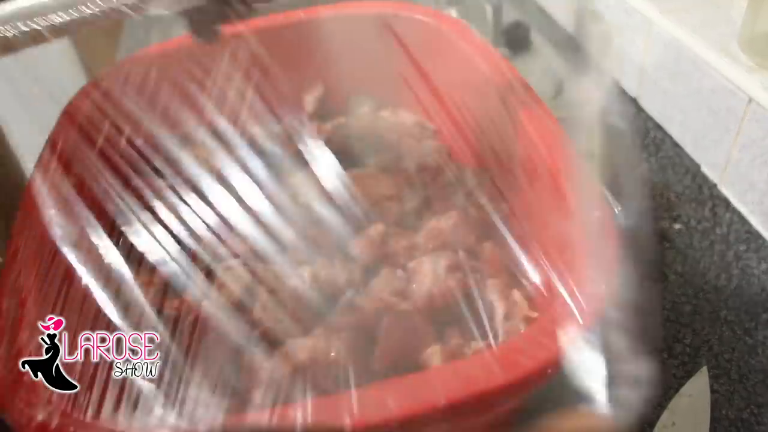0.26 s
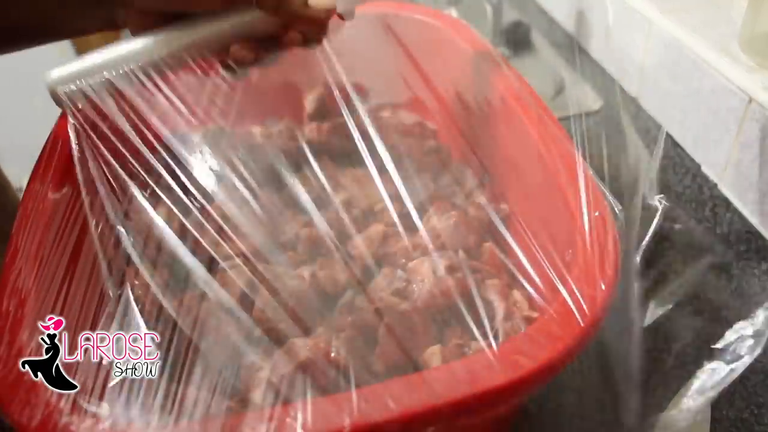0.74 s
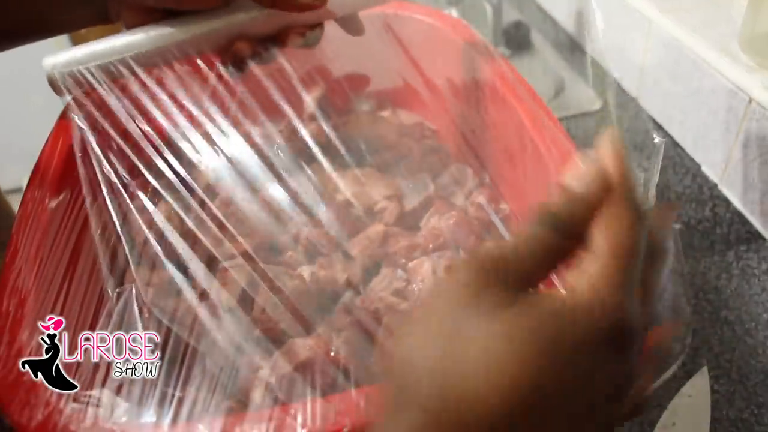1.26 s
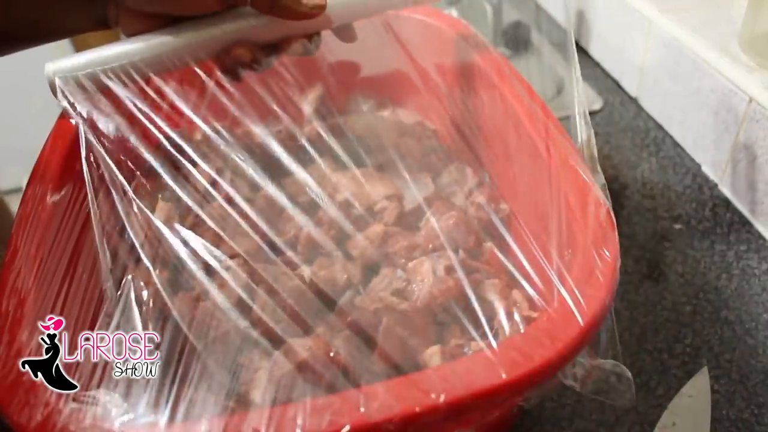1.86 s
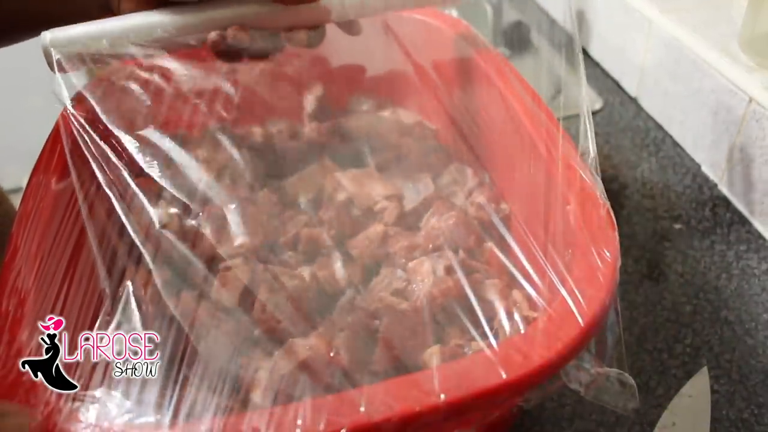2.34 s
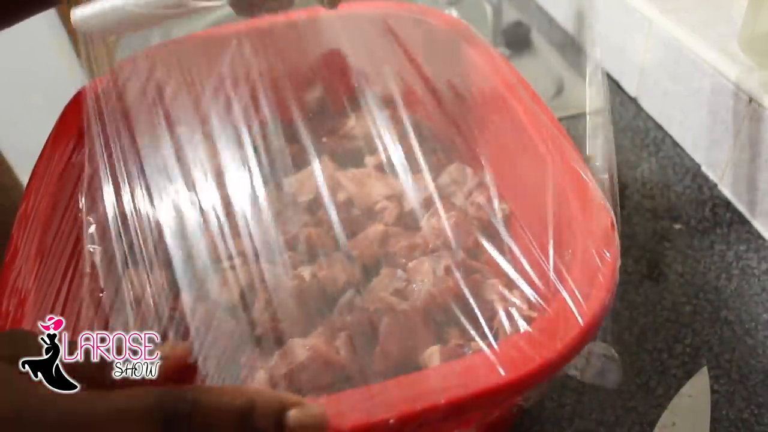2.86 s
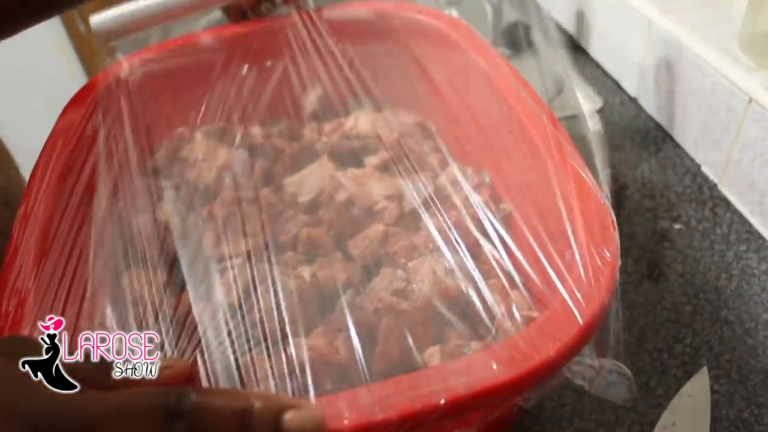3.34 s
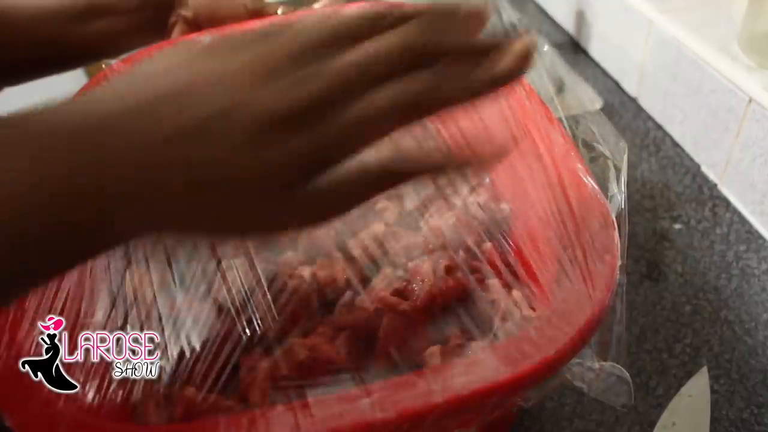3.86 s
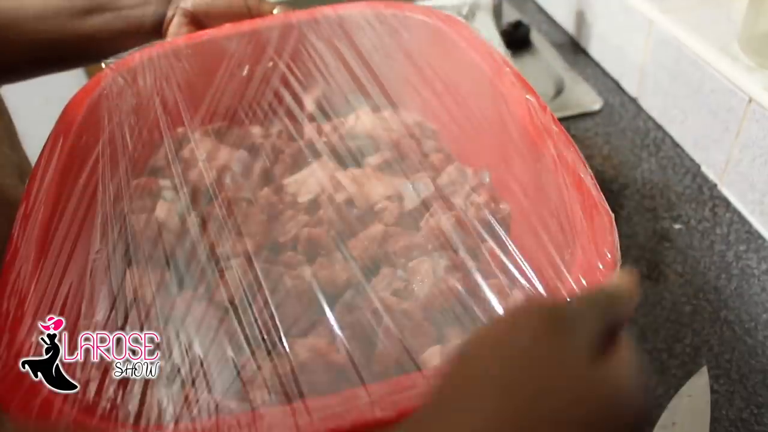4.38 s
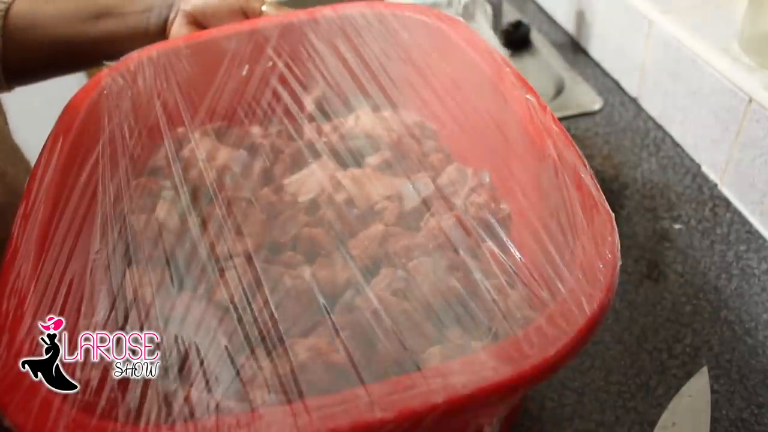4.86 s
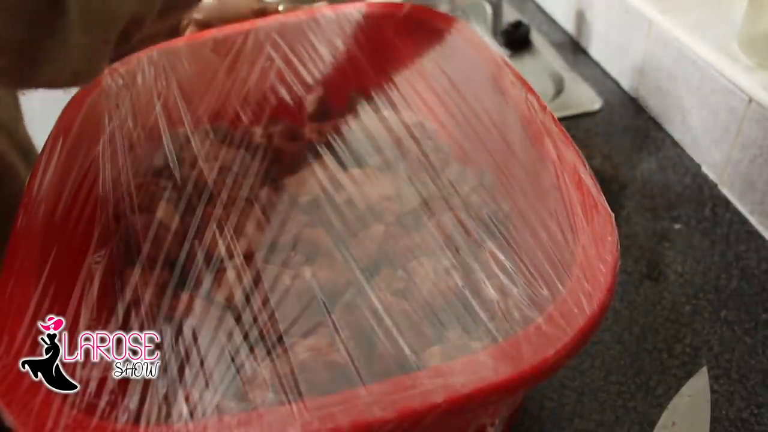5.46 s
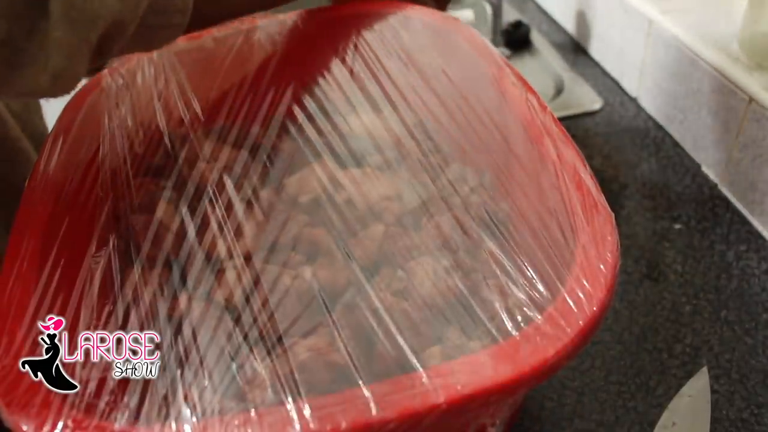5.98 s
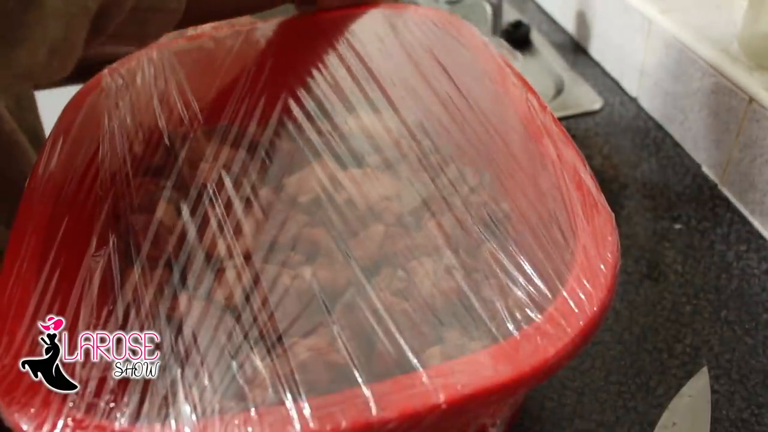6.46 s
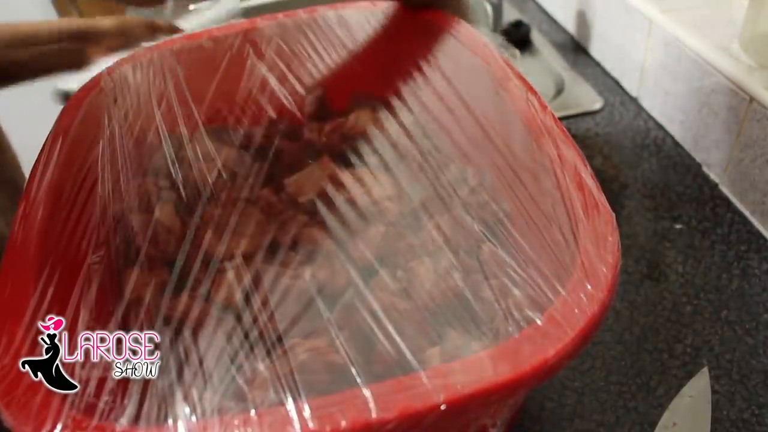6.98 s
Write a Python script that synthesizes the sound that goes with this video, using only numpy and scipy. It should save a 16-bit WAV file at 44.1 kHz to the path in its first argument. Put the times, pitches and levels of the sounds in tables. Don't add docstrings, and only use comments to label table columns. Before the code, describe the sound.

In a small tiled kitchen, heard close up in stereo over soft hiss and mains hum, cling film is stretched around a plastic bowl. The first 0.9 seconds hold faint rustles and tiny ticks, then a short chirping snap. From 1.3 to 1.9 s, crackles, squeaks, a low creak and hollow bowl knocks cluster together. A deep thump at 2.3 s is followed by a quick rising squeak near 2.45 s, then quiet crinkling. At 3.4 s a sharp snap rings brightly, with buzzy squeaks just after. Around 4.05 s a low thud hits the bowl, followed by fine crackles until 4.8 s. Small pops come at 5.1 and 5.7 s. A firm knock lands at 6.1 s, rustles and bumps follow from 6.5 s, and the loudest bright crackling burst with a shove arrives at 7 s, ringing briefly.

```python
import sys
import numpy as np
from scipy import signal
from scipy.fft import rfft, irfft, next_fast_len
from scipy.io import wavfile
from scipy.ndimage import uniform_filter1d, map_coordinates

SR = 44100
rng = np.random.default_rng(int(sys.argv[2]) if len(sys.argv) > 2 else 0)


def makeup_ratio(level_db):
    decades = np.asarray(level_db, float) / 20
    return 10 ** decades


def unload_audio(sound):
    columns = np.transpose(np.atleast_2d(sound))
    steps = np.round(np.clip(columns, -1, 1) * 32767)
    wavfile.write(sys.argv[1], SR, steps.astype(np.int16))


N = 317975


def evened(x):
    return x / np.sqrt(np.mean(x ** 2) + 1e-20)


def read(points, hz):
    f, value = np.transpose(points)
    return np.interp(np.log(hz + 1), np.log(f + 1), value)


def add(mix, s, sound):
    part = mix[:, round(s * SR):][:, :sound.shape[1]]
    part += sound[:, :part.shape[1]]


def highpass(x, order, hz):
    return signal.sosfilt(signal.butter(order, hz, "high", fs=SR, output="sos"), x)


def resonate(x, hz, width):
    turn = np.exp(2j * np.pi * np.cumsum(hz * np.ones(x.shape[-1])) / SR)
    r = np.exp(-np.pi * width / SR)
    return 2 * (turn * signal.lfilter([1 - r], [1, -r], x / turn + 1e-18)).real


def coloured(x, points):
    log_gain = np.log(makeup_ratio(read(points, abs(np.fft.fftfreq(1024, 1 / SR)))))
    taps = np.fft.ifft(np.exp(np.conj(signal.hilbert(log_gain)))).real[:256]
    return signal.oaconvolve(x, taps[None], axes=1)[:, :x.shape[1]]


def slips(count, per_s, spread_db):
    draw = rng.random((count, 4))
    size = makeup_ratio(-spread_db * np.log(draw[:, 0] + .015))
    size = size * np.sign(draw[:, 1] - .5) * (draw[:, 2] < per_s / SR)
    delay = np.round(3.2 * draw[:, 3] - 1.6).astype(int)
    late = np.clip(np.arange(count) + delay, 0, count - 1)
    return np.array([size, np.bincount(late, size, count)])


def thin(x):
    return evened(highpass(x, 2, 420))


def film(drive, pitch_hz):
    ring = resonate(drive, pitch_hz, 1020) + makeup_ratio(-12.5) * resonate(drive, 1.9 * pitch_hz, 770)
    return thin(resonate(ring, 1.3 * pitch_hz, 8100))


# frequency in Hz, level in
# dB per Hz.
FIZZ = [(1760, 15.5), (3000, -51), (3380, 14), (3890, 3), (8110, 3.5), (12500, 2), (15800, -3),
        (17000, -50)]


def fizz(drive):
    return thin(coloured(drive, FIZZ))


# frequency in Hz, width in Hz, level in dB.
BOWL = [(133, 12, -13), (258, 61, 2), (404, 89, 1.5), (526, 78, -2), (595, 88, 2), (785, 230, 3)]


def bowl(push):
    ring = 0
    for hz, width, db in BOWL:
        ring = ring + makeup_ratio(db) / np.sqrt(width) * signal.lfilter(*signal.iirpeak(hz, hz / width, SR), push)
    return signal.lfilter(*signal.butter(2, 1100 / SR * 2), ring)


# start in seconds, length in seconds, effort in dB, film pitch in Hz, fizz in dB.
PEELS = [(1.635, 0.019, -21.5, 1570, -36), (3.421, 0.0033, -31.5, 2260, 0), (4.22, 0.16, -43.5, 2440, -1),
         (4.4, 0.065, -43, 2720, -7), (4.47, 0.098, -39, 2400, -3), (4.58, 0.27, -44.5, 2010, 0.5),
         (5.537, 0.013, -45, 1650, -8), (5.667, 0.0018, -36.5, 2030, -8), (5.76, 0.13, -57, 2100, -1),
         (6.07, 0.023, -27.5, 1680, 2), (6.99, 0.072, -16.5, 2460, -6)]
PULLS = [(0, 0.013, -47.5, 1750, -2.5), (.12, 0.091, -58, 1500, -2), (.498, 0.035, -42, 2620, -4),
         (1.74, .1, -37.5, 1300, -6), (1.85, 0.11, -35, 2300, -8.5), (2.55, 0.073, -54, 1400, 4.5),
         (2.66, 0.051, -48, 1520, -2), (2.77, 0.18, -56, 1480, -0.5), (2.915, 0.18, -51.5, 1900, 0.5),
         (3.05, 0.083, -44.5, 1780, -4), (3.14, 0.12, -48, 2150, -11), (3.59, 0.011, -37, 2030, -13),
         (4.09, 0.017, -24, 1100, -30), (4.35, 0.0042, -40, 1130, -17), (5.08, 0.021, -50.5, 1280, -12),
         (5.138, .002, -44, 1580, -24), (5.918, 0.2, -54.5, 1990, -4), (6.57, 0.059, -17, 1740, -2)]
PRESSES = [(.7, 0.25, -49, 1420, -6), (.936, .002, -29.5, 970, -23), (1.13, 0.23, -57, 1260, -25),
           (1.334, 0.034, -28, 1200, -3.5), (1.39, 0.056, -29.5, 1190, -11),
           (1.441, 0.0018, -24.5, 1300, -20), (1.48, 0.099, -33, 1100, -5.5), (1.67, 0.018, -31, 1360, -3),
           (2.326, 0.035, -24.5, 970, -32), (2.4, 0.11, -37, 1700, -12), (3.35, 0.043, -50, 1540, -4),
           (3.44, .06, -60, 2210, -35), (3.516, .002, -36.5, 2020, -26), (3.724, 0.027, -36, 1400, -1),
           (4.034, 0.051, -30, 1310, -9), (4.15, 0.082, -38, 1530, -4.5), (6.132, .002, -23.5, 820, -7),
           (6.22, 0.085, -40.5, 920, -3.5), (6.53, 0.012, -25.5, 1350, -8.5), (6.7, 0.11, -34.5, 1190, -11),
           (6.877, 0.07, -29.5, 1120, -17)]


def gestures():
    rise_s, rise_db = 0.037, 7
    rest_db, rest_hz, rest_push_db, rest_fizz_db = -63, 1300, 11.5, -20
    rest = [1, np.log(rest_hz), makeup_ratio(2 * rest_push_db), makeup_ratio(2 * rest_fizz_db)]
    sums = np.outer(rest, np.full(N, makeup_ratio(2 * rest_db)))
    for rows, push_db, fade in [(PEELS, -14, 197), (PULLS, -1.6, 172), (PRESSES, 2.44, 205)]:
        for s, length, db, hz, fizz_db in rows:
            t = np.arange(0, length + .5, 1 / SR)
            swell_db = -rise_db * np.maximum(min(length, rise_s) - t, 0) / rise_s
            shape_db = swell_db - fade * np.maximum(t - length, 0)
            stroke = [1, np.log(hz), makeup_ratio(2 * push_db), makeup_ratio(2 * fizz_db)]
            add(sums, max(s, 0), np.outer(stroke, makeup_ratio(2 * (db + shape_db))))
    power, pitch, push, fizz_power = sums
    push_db, fizz_db = 10 * np.log10(push / power), 10 * np.log10(fizz_power / power)
    return 10 * np.log10(power), np.exp(pitch / power), push_db, fizz_db


# pitch as a factor on the film pitch, width in Hz, level in dB.
FACETS = [(.6, 318, -2), (.82, 410, -5), (1.03, 533, -1), (1.35, 664, -2), (1.7, 905, -4)]


def rustle():
    level_db, pitch_hz, push_db, fizz_db = gestures()
    drive = slips(count=N, per_s=12000, spread_db=1.5)
    facet, sheet, swarm = rng.integers(0, len(FACETS), N), 0, 0
    for k, (factor, width, db) in enumerate(FACETS):
        clumps = makeup_ratio(3.3 * evened(uniform_filter1d(rng.standard_normal(N), 400)))
        part = drive * (facet == k) * clumps
        sheet = sheet + makeup_ratio(db) * evened(resonate(part, factor * pitch_hz, width))
        swarm = swarm + part
    sheet = thin(resonate(sheet, 1.2 * pitch_hz, 6400)) + makeup_ratio(fizz_db + 0.5) * fizz(swarm)
    return makeup_ratio(level_db - 3.5) * (sheet + makeup_ratio(push_db - 2.0) * evened(bowl(swarm)))


# start in seconds, peak in dB, film pitch in Hz, length in seconds.
TICKS = [(.091, -41, 2480, 0.0067), (.499, -34.5, 4250, 0.013), (.551, -44, 775, 0.0084),
         (.591, -37, 1270, 0.006), (.682, -40, 1480, 0.017), (.784, -38, 1300, 0.0099),
         (2.916, -37, 2800, 0.0072), (3.724, -29, 935, 0.0077), (3.778, -23.5, 1050, 0.0037),
         (5.538, -38.5, 1380, 0.026), (5.6665, -25, 2300, 0.0086), (5.918, -45.5, 4860, 0.019),
         (6.425, -46, 1720, 0.026), (6.57, -26, 810, 0.074), (6.9865, -9.5, 2970, 0.024),
         (6.9905, -4.5, 2840, 0.0017), (7.004, -12, 3500, 0.0027), (7.038, -13, 2880, 0.0048),
         (7.066, -14, 3000, 0.0035), (6.603, -16, 1700, 0.0034), (6.619, -13, 2400, 0.0047),
         (6.628, -17, 1500, .003)]
CRACKS = [(3.421, -21, 7500, .012), (1.3265, -38, 3000, .008), (1.5758, -28, 3330, .006),
          (1.369, -24, 2400, .005), (4.688, -37, 2480, .006), (1.34, -25.5, 1740, 0.044),
          (1.616, -23.5, 4130, 0.011), (2.77, -34, 2000, 0.0053), (.855, -37, 2200, .03),
          (3.421, -11, 1480, 0.014), (3.736, -39, 840, 0.01), (4.599, -24.5, 1980, 0.0089),
          (4.712, -32.5, 1380, 0.023), (4.75, -28.5, 2500, 0.008), (4.804, -31, 1870, 0.0073),
          (6.076, -21.5, 2430, 0.031), (6.28, -28.5, 1790, 0.015), (6.967, -21, 1900, 0.018)]
POPS = [(.936, -22, 910, 0.0055), (1.505, -28, 1050, 0.043), (1.853, -30, 2200, 0.028),
        (1.9, -27, 3320, 0.014), (1.925, -28, 2500, .005), (2.306, -39, 2520, 0.032),
        (2.328, -23, 2500, 0.0097), (3.259, -39.5, 1900, 0.015), (3.427, -12.5, 2740, 0.0047),
        (3.4315, -13.5, 2940, 0.0022), (3.515, -18.5, 1840, 0.017), (4.359, -29.5, 810, 0.024),
        (4.39, -27, 1220, 0.013), (4.448, -30, 2500, 0.004), (4.36, -28, 2300, .003),
        (4.386, -29, 3200, .003), (4.478, -31, 3850, .003), (4.488, -27, 3700, .003),
        (4.511, -30, 3600, .003), (4.517, -27, 3770, .003), (4.537, -27, 3800, .004),
        (4.55, -27, 3900, .008), (4.578, -28, 3800, .003), (4.62, -32, 1700, .004),
        (5.142, -31.5, 1500, 0.016), (6.775, -28.5, 785, 0.049), (6.877, -21, 1460, 0.015)]
THUDS = [(2.318, -36, 2000, 0.02), (1.441, -20, 1690, 0.006), (1.646, -27.5, 1370, 0.014),
         (1.667, -22, 1760, 0.0025), (1.353, -20, 1690, 0.0037), (1.544, -22, 1100, .003),
         (1.681, -16.5, 1600, 0.0025), (2.456, -26.5, 1200, .003), (2.343, -12, 865, 0.0088),
         (4.035, -25.5, 1990, 0.023), (4.091, -16.5, 1400, 0.008), (4.578, -35.5, 2100, .014),
         (6.132, -9, 1100, 0.008), (6.533, -14, 710, 0.0056), (6.901, -20, 740, 0.029)]
# releases, push into the bowl in dB, fizz in dB.
KINDS = [(TICKS, -12, -2.1), (CRACKS, -18, -16), (POPS, -37, -48), (THUDS, 1.95, -53)]


def snaps():
    out, t = np.zeros((2, N)), np.arange(2600) / SR
    for rows, push_db, fizz_db in KINDS:
        for s, db, hz, length in rows:
            drive = slips(count=len(t), per_s=5600, spread_db=3.0)
            drive[:, 3] += 2.5
            drive = drive * np.exp(-(t / max(length, .002)) ** 1.4)
            sheet = film(drive, hz) + makeup_ratio(fizz_db) * fizz(drive)
            burst = sheet + makeup_ratio(push_db + 2.5) * evened(bowl(drive))
            add(out, s, makeup_ratio(db - 9.5) * np.sqrt(length / t[-1]) * burst)
    return out


# start in seconds, length in seconds, level in dB.
CREASES = [(0.084, 0.013, -54.5), (0.137, 0.039, -55.5), (0.223, .006, -56), (3.421, .012, -36),
           (0.352, 0.064, -55), (0.451, .012, -52), (.499, 0.022, -45.5), (0.535, 0.063, -60),
           (.65, .005, -57), (0.693, .01, -60), (0.735, 0.02, -58), (2.672, 0.028, -51.5),
           (2.768, .01, -60), (3.048, 0.099, -53.5), (4.245, .01, -48), (5.08, 0.046, -61),
           (5.532, 0.028, -49.5), (5.664, 0.013, -34), (5.918, 0.047, -50.5), (6.79, .02, -45),
           (6.97, .012, -36)]


def creases():
    out, fade_db_per_s = np.zeros((2, N)), 250
    for s, length, db in CREASES:
        drive = resonate(slips(count=9000, per_s=4500, spread_db=5.5), hz=8600, width=15000)
        drive = evened(highpass(drive, 2, 5000))
        t = np.arange(drive.shape[1]) / SR
        add(out, s, drive * makeup_ratio(db - fade_db_per_s * np.maximum(t - length, 0)))
    return out


# start in seconds,
# length in seconds, first slip rate in Hz, last slip rate in Hz, level in dB.
BUZZES = [
    (.9342, 0.0065, 526, 553, -25.5),
    (1.362, 0.012, 835, 860, -25.5),
    (2.404, 0.046, 522, 620, -34),
    (3.596, 0.017, 1750, 2200, -35),
    (3.513, 0.011, 1600, 2050, -25.5),
    (3.518, 0.008, 992, 970, -29.5),
    (3.521, 0.0127, 793, 786, -32),
    (3.534, 0.053, 949, 920, -37),
    (4.419, 0.0146, 620, 590, -39),
    (4.577, 0.023, 1060, 1020, -43),
]
CHIRPS = [
    (2.453, .029, 1090, 1760, -26.5),
    (.934, .012, 944, 990, -23.5),
    (1.5, .082, 223, 234, -30.5),
    (4.38, 0.026, 615, 627, -32.5),
    (5.136, 0.013, 1290, 1610, -38),
]
WHISTLES = [(1.439, 0.032, 178, 204, -27.5), (2.454, 0.025, 3400, 4250, -35),
            (1.638, 0.046, 1793, 1615, -29.5), (1.645, 0.036, 1465, 1160, -26.5),
            (1.665, .032, 853, 468, -29), (1.468, 0.027, 204, 224, -31), (1.5, 0.021, 1274, 1180, -32),
            (1.5, 0.026, 764, 680, -32), (1.535, 0.019, 1260, 1050, -33), (2.446, 0.04, 690, 1050, -33),
            (2.43, .02, 3400, 3500, -45), (2.405, 0.055, 1570, 1457, -36.5),
            (2.408, 0.055, 2120, 2200, -37.5), (3.514, 0.02, 3800, 4250, -30),
            (3.605, .012, 4100, 4500, -38), (7.025, .018, 2500, 2950, -22), (3.52, .012, 2880, 3110, -26),
            (3.522, 0.0095, 1620, 1580, -26.5), (4.347, 0.018, 1060, 860, -38)]
# squeaks, dB lost with each overtone.
CHATTER = [(BUZZES, -3.5), (CHIRPS, -5.5), (WHISTLES, -26)]


def squeaks():
    out = np.zeros((2, N))
    for rows, slope_db in CHATTER:
        for s, length, first_hz, last_hz, db in rows:
            u = np.linspace(0, 1, int(length * SR))
            wobble, flutter = (evened(uniform_filter1d(v, 90)) for v in rng.standard_normal((4000, 2)).T)
            rate_hz = first_hz + (last_hz - first_hz) * u ** 1.4
            turns = np.cumsum(rate_hz * (1 + .03 * wobble[:len(u)])) / SR
            tone = 0
            for k in range(5):
                overtone = np.cos(2 * np.pi * (k + 1) * turns + k * k)
                tone = tone + makeup_ratio(slope_db * k - .8 * k * k) * overtone
            tone = makeup_ratio(db + 3.5 * flutter[:len(u)]) * evened(tone) * signal.windows.tukey(len(u), .3)
            add(out, s, np.array([tone, tone]))
    return out


# start in seconds, peak in dB, pitch in Hz, t60 in seconds.
RINGS = [(3.421, -22, 830, .16), (3.425, -16.5, 2520, .12), (3.428, -17.5, 2897, 0.074),
         (3.423, -29, 3250, 0.17), (3.437, -26, 1447, 0.2), (3.424, -23, 1900, .1), (3.425, -26, 4000, .15),
         (3.43, -27, 4450, .15), (3.535, -33, 2400, .2), (3.53, -27, 930, 0.31), (3.53, -30, 1866, 0.25),
         (3.533, -34, 2940, 0.14), (3.61, -42, 3700, .2), (3.61, -36, 2007, 0.22), (5.142, -34, 1605, 0.18),
         (5.143, -39, 2980, .1), (5.146, -42, 3360, 0.24), (5.143, -43, 4480, .12), (5.6665, -28, 1900, .1),
         (5.6665, -30, 2500, 0.2), (5.67, -34, 2250, 0.2), (5.7, -37, 2050, .15), (5.68, -40, 1000, .2),
         (2.483, -28, 1330, 0.2), (.945, -26, 1000, 0.28)]
RIM_RINGS = [(.9345, -24, 1620, .06), (.936, -27, 2200, .1), (.937, -25, 450, .15), (1.441, -22, 1600, .05),
             (1.352, -25, 1750, .1), (1.65, -26, 2400, .08), (4.034, -28, 1900, .08),
             (4.091, -24, 1850, .03), (4.098, -23, 950, .12), (4.112, -27, 800, .12),
             (6.134, -19, 720, .08), (6.155, -21, 750, .07), (6.132, -24, 1750, .06),
             (6.278, -30, 1700, .05), (6.285, -33, 1000, .08), (6.132, -20, 240, .15),
             (6.095, -28, 1000, .08), (6.09, -28, 2700, .1), (4.58, -36, 2150, .15), (1.9, -33, 3550, .08),
             (4.405, -36, 1180, .1), (4.405, -37, 720, .15), (2.344, -20, 900, .05),
             (6.99, -22, 4054, 0.37), (7.04, -21, 2900, 0.2), (7.06, -22, 3900, .25), (7.1, -26, 2550, .35),
             (7.06, -26, 1600, .4), (6.99, -20, 3550, .1), (7.04, -23.5, 3500, 0.16),
             (7.06, -24, 2310, 0.23)]


def rings():
    out, t = np.zeros((2, N)), np.arange(SR // 4) / SR
    flutter_db, drift_share = 5, .025
    for s, db, hz, t60 in list(RINGS) + list(RIM_RINGS):
        drift, flutter = (evened(uniform_filter1d(v, 160)) for v in rng.standard_normal((len(t), 2)).T)
        ring = np.sin(2 * np.pi * hz * np.cumsum(1 + drift_share * drift) / SR)
        ring = ring * makeup_ratio(db - 5 + flutter_db * flutter - 60 * t / max(t60, .02))
        add(out, s, np.array([ring, ring]))
    return out


# start in seconds, peak in dB, pitch in Hz, t60 in seconds.
KNOCKS = [(0.893, -34, 404, 0.18), (1.345, -16, 371, 0.092), (1.437, -11.5, 390.6, 0.11),
          (1.466, -15, 378, 0.14), (1.676, -12, 392, 0.078), (1.722, -24.5, 390, 0.08),
          (2.339, -8.5, 137, 0.074), (2.917, -24, 86, 0.098), (4.048, -6, 228, 0.035),
          (4.09, -16, 440, 0.07), (6.09, -30, 300, 0.08), (6.131, -8.5, 382, 0.061), (6.527, -23, 247, 0.1),
          (6.593, -16, 445, 0.06), (6.783, -20.5, 235, 0.13), (6.915, -20.5, 404, 0.074),
          (6.968, -15, 504, 0.022), (6.994, -8, 272, 0.037), (7.002, -4, 500, 0.016),
          (1.535, -20, 447, 0.057), (1.647, -20, 420, 0.047), (6.738, -23, 590, .05),
          (6.615, -10, 555, .07), (6.38, -38, 160, .1), (6.447, -43, 480, .2), (6.35, -44, 420, .2)]
SHUFFLE = [
    (1.342, -19.5, 133, 0.11),
    (6.19, -20.5, 79, 0.35),
    (6.996, -18, 100, 0.2),
    (6.78, -30, 115, .3),
    (6.88, -28, 115, .25),
    (6.56, -30, 90, .2),
    (6.92, -25, 245, .15),
    (2.4, -32, 100, .3),
]


def knocks():
    out, t = np.zeros((2, N)), np.arange(SR // 3) / SR
    for s, db, hz, t60 in list(KNOCKS) + list(SHUFFLE):
        decay = makeup_ratio(db - 1.0 - 60 * t / max(t60, .02))
        ring = decay * (1 - np.exp(-t * hz / 0.79)) * np.sin(2 * np.pi * hz * t)
        add(out, s, np.array([ring, ring]))
    return out


# frequency in Hz, likeness from 0 to 1.
SAME = [(100, 0.36), (500, 0.75), (1500, 0.5), (4000, 0.077), (12000, 0.011)]


def diffuse(z, spread=1):
    same = np.clip(read(SAME, np.fft.rfftfreq(512, 1 / SR)), 0, 1)[:, None] ** spread
    pair = np.array([z[0], same * z[0] + np.sqrt(1 - same ** 2) * z[1]])
    return signal.istft(pair, nperseg=512, noverlap=384)[1]


# frequency in Hz, t60 in seconds.
KITCHEN = [(150, 0.13), (660, 0.31), (1740, 0.29), (4590, 0.56), (9000, .35), (14000, 0.14)]


def kitchen(x):
    first, gap, sway_s = 130, 20, .00005
    taps = np.zeros((2, SR // 2))
    at = np.arange(first, SR // 2 - gap, gap)
    at = at + rng.integers(0, gap, (2, len(at)))
    np.put_along_axis(taps, at, rng.choice([-1., 1.], at.shape), 1)
    hz, t, z = signal.stft(taps, SR, nperseg=512, noverlap=384)
    tail = diffuse(z * makeup_ratio(-60 * t / read(KITCHEN, hz)[:, None]), spread=0.41)
    tail = tail * (np.arange(len(t) * 128 - 128) > first)
    wet = signal.fftconvolve(x.mean(0)[None], tail / np.linalg.norm(tail[0]), axes=1)[:, :N]
    sway = evened(uniform_filter1d(uniform_filter1d(rng.standard_normal(N), 500), 500))
    heard = np.arange(N) + sway_s * SR * sway
    return np.array([map_coordinates(v, [heard], order=2) for v in wet])


# frequency in Hz, level in dB per Hz.
AIR = [(41, -33), (70, 3), (166, -7), (228, 8.5), (328, -8.5), (394, 8), (451, -9), (541, -4.5),
       (1340, -9.5), (3570, -11), (10400, -21), (13600, -24), (16000, -24)]
# frequency in Hz, level in dB rms.
HUM = [(49.5, -71), (100, -76), (200, -76), (400, -74)]


def air():
    a, b, c, d, patches = rng.standard_normal((N // 128 + 5, 257, 5)).T
    patches = evened(uniform_filter1d(uniform_filter1d(patches, 8, 0), 30, 1))
    level_db = read(AIR, np.fft.rfftfreq(512, 1 / SR))[:, None] + 0.79 * patches
    z = np.array([a + 1j * b, c + 1j * d]) * makeup_ratio(level_db)
    hiss = makeup_ratio(-53.5) * evened(highpass(diffuse(z)[:, :N], 4, 60))
    hum = 0
    for hz, db in HUM:
        hum = hum + makeup_ratio(db + 7.5) * np.sin(2 * np.pi * (hz * np.arange(N) / SR + rng.random()))
    rumble = makeup_ratio(-72) * evened(resonate(resonate(rng.standard_normal(N), 54, 44), 54, 44))
    return hiss + hum + rumble


def equalised(x, points, scale):
    size = next_fast_len(N)
    gain = makeup_ratio(read(points, np.fft.rfftfreq(size, 1 / SR)) * scale)
    return irfft(rfft(x, size) * gain, size)[:, :N]


# frequency in Hz, gain in dB.
MIC = [(25, -40), (45, -12), (70, -18.5), (110, -3.5), (9000, 0), (13000, -3.5), (15800, -10)]


def capsules(x):
    return equalised(x, MIC, 1)


def scene():
    sharp = snaps()
    soft = rustle() + knocks() + creases()
    tones = squeaks() + rings()
    wet = kitchen(makeup_ratio(-3) * sharp + makeup_ratio(-6.5) * soft + makeup_ratio(-10.5) * tones)
    return capsules(sharp + soft + tones + wet) + air()


def band_limit(x):
    return signal.sosfilt(signal.butter(12, 15900, fs=SR, output="sos"), x)


# frequency in Hz, left minus right in dB.
LEAN = [(100, 2), (300, 2.5), (1000, 1.5), (4000, 0.04)]


def record(dry):
    left, right = equalised(dry[:1], LEAN, 0.5), equalised(dry[1:], LEAN, -0.5)
    ports = np.concatenate([left, right])
    ports = .9 * np.tanh(ports / .9)
    return band_limit(ports)


dry = scene()
out = record(dry)
unload_audio(out)
```